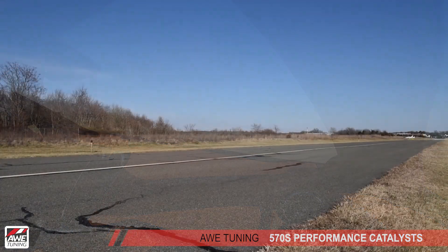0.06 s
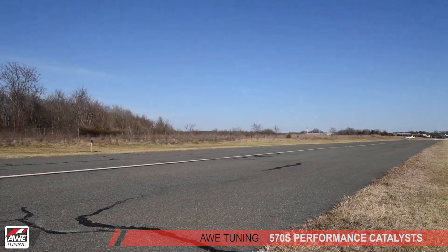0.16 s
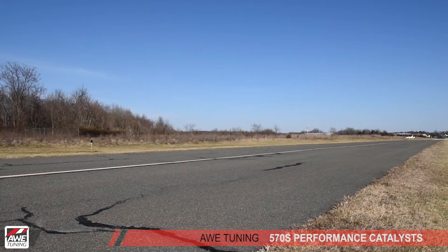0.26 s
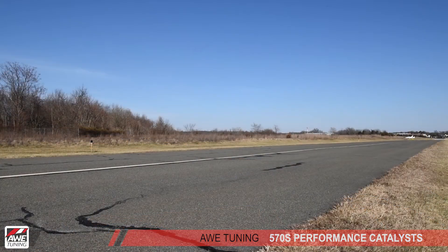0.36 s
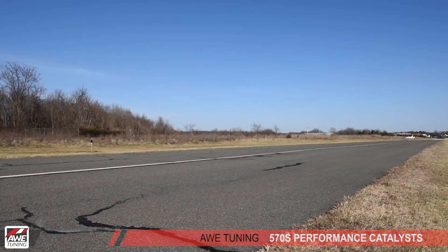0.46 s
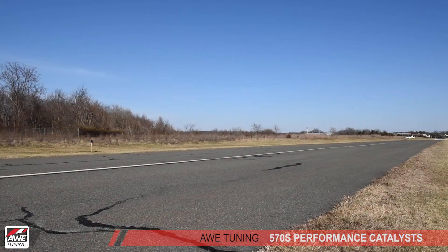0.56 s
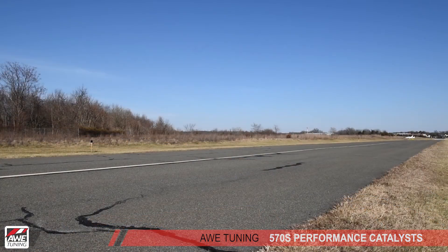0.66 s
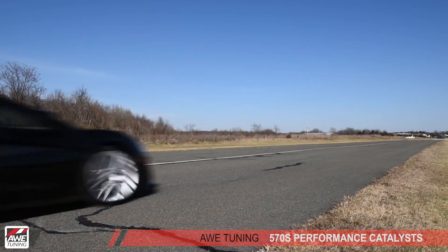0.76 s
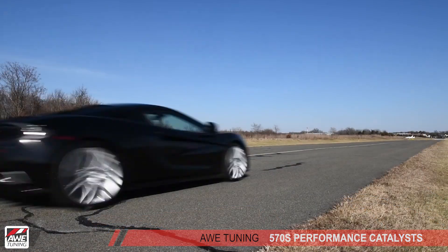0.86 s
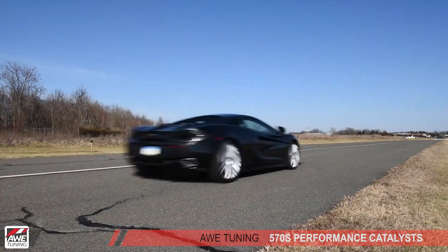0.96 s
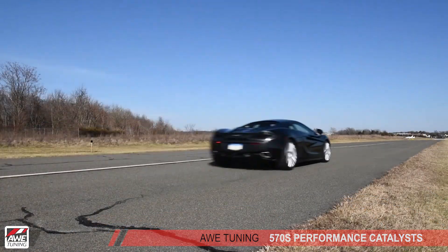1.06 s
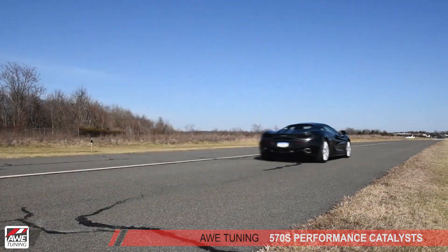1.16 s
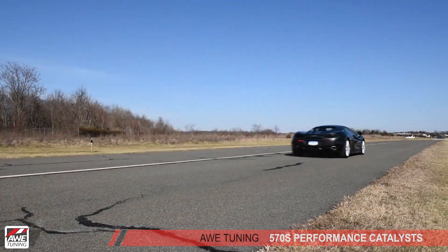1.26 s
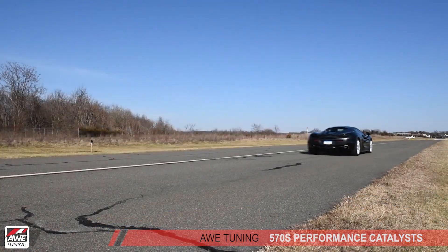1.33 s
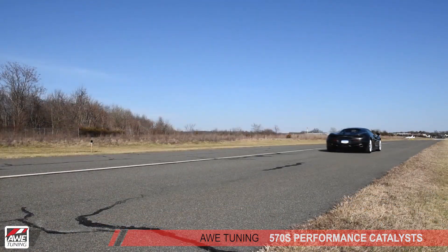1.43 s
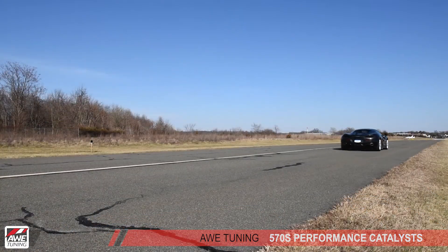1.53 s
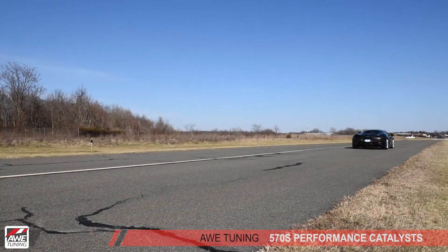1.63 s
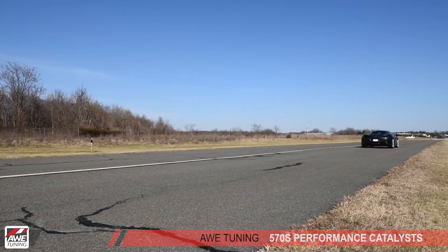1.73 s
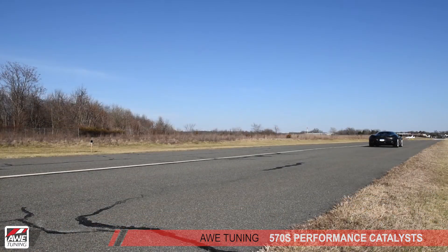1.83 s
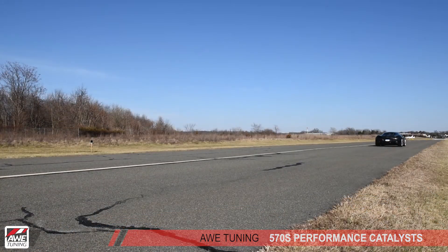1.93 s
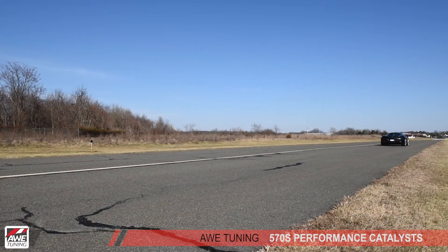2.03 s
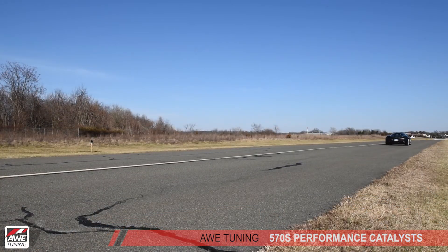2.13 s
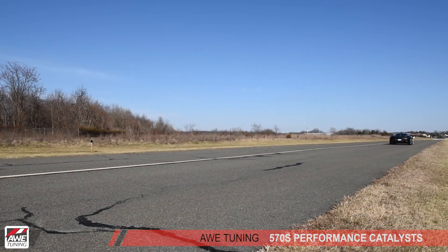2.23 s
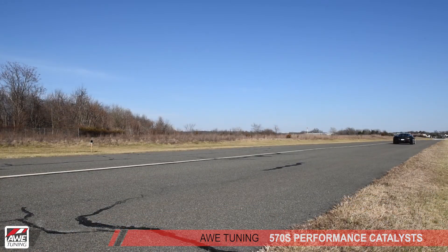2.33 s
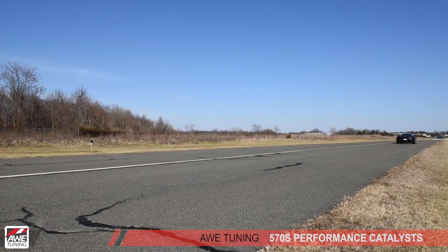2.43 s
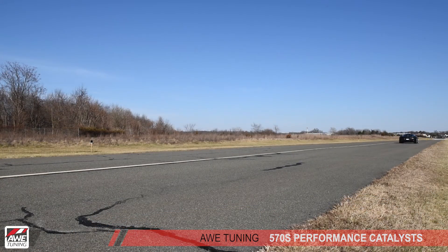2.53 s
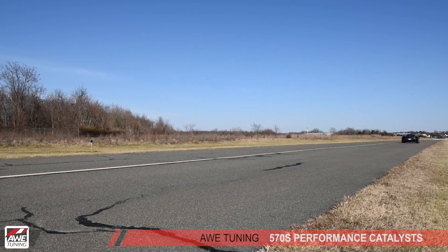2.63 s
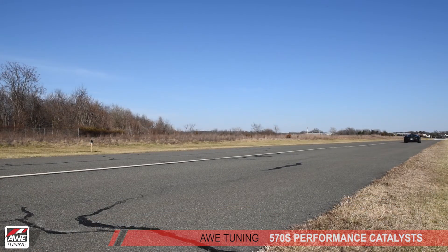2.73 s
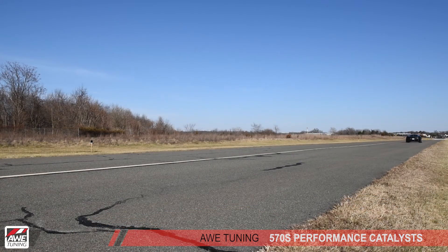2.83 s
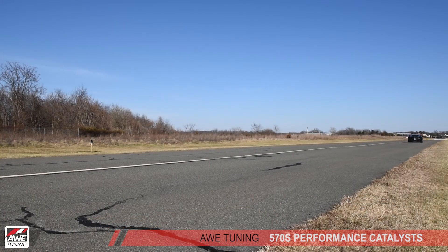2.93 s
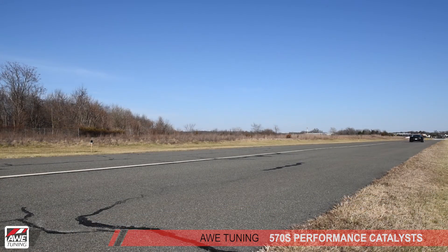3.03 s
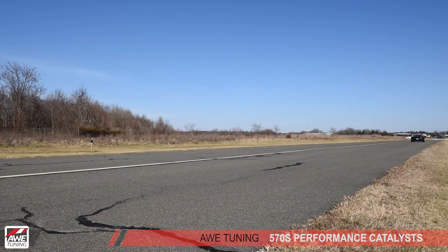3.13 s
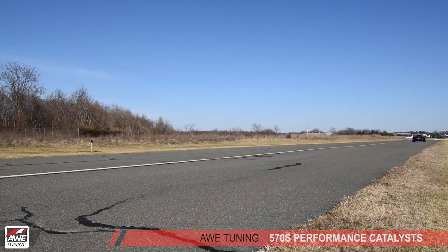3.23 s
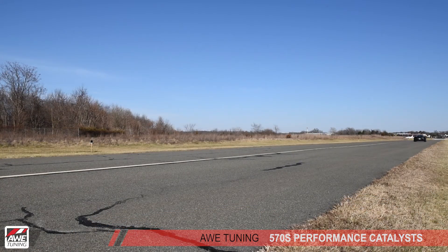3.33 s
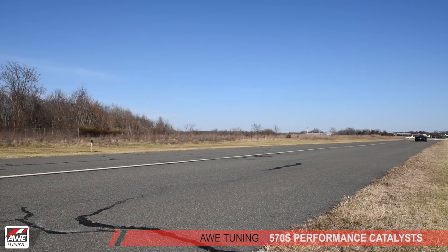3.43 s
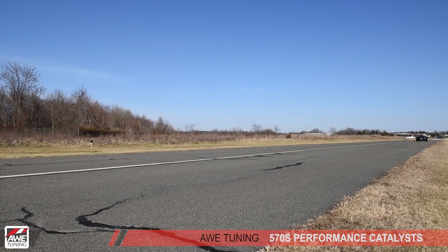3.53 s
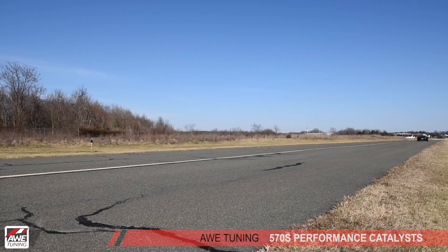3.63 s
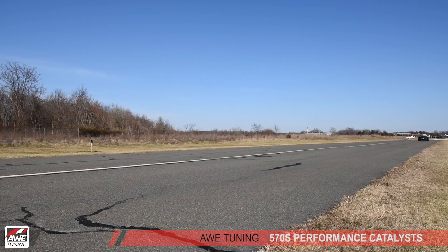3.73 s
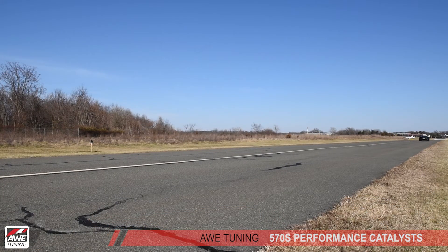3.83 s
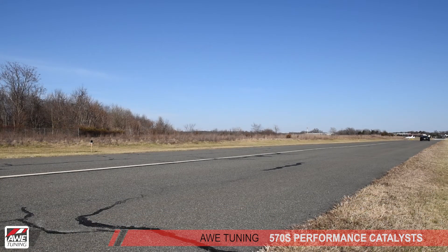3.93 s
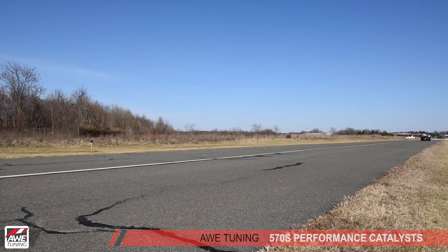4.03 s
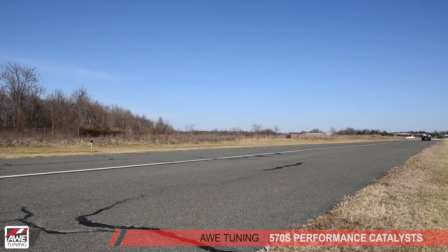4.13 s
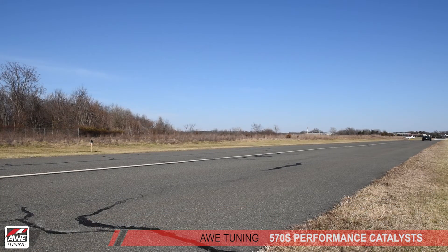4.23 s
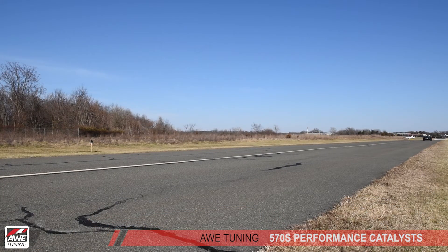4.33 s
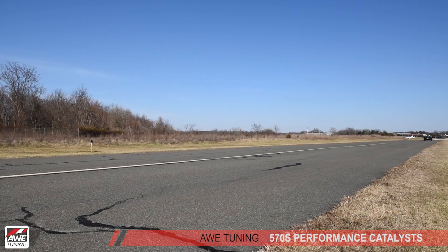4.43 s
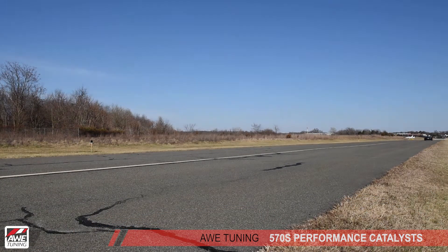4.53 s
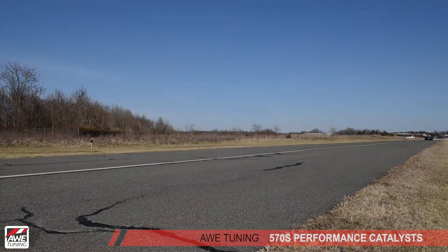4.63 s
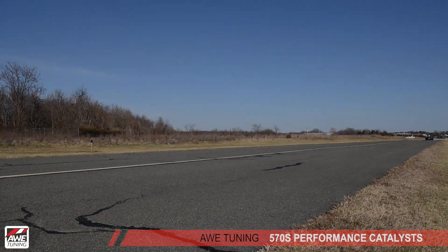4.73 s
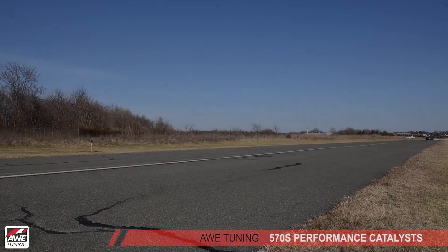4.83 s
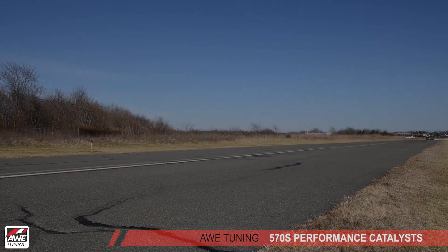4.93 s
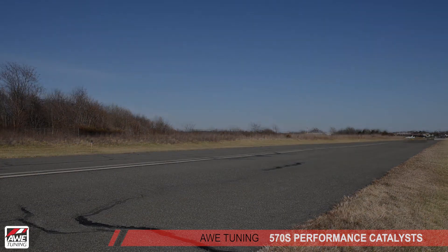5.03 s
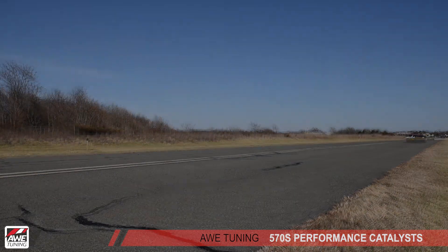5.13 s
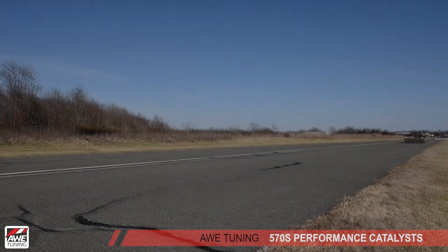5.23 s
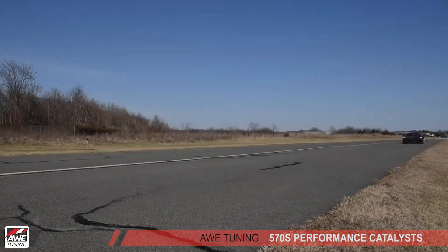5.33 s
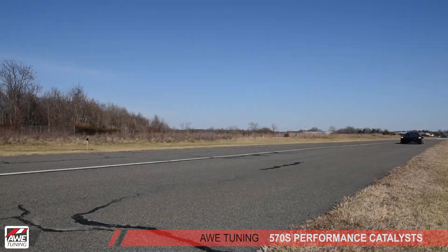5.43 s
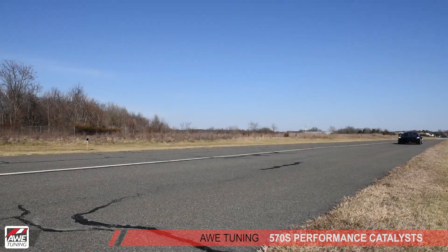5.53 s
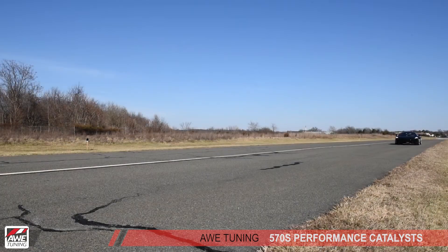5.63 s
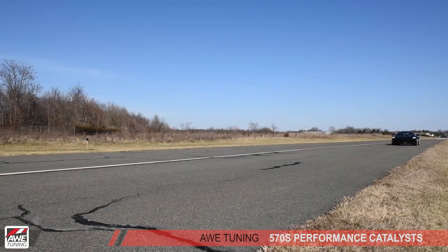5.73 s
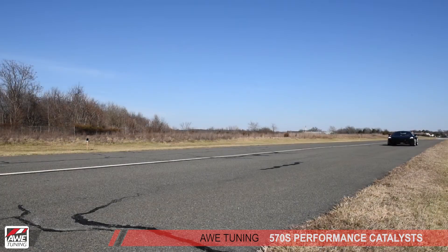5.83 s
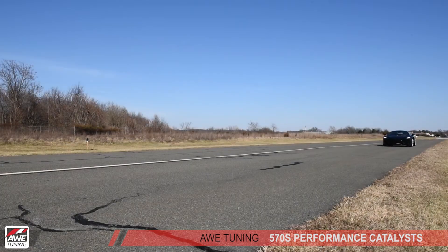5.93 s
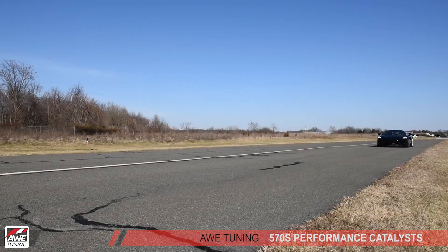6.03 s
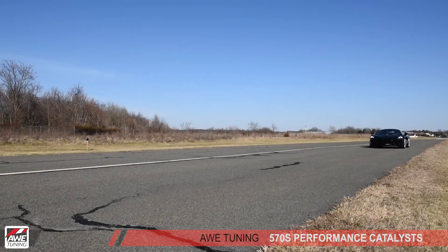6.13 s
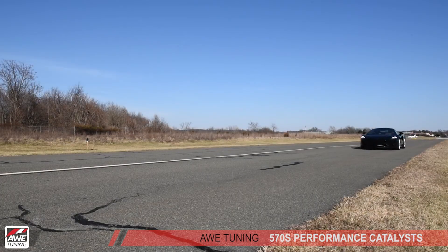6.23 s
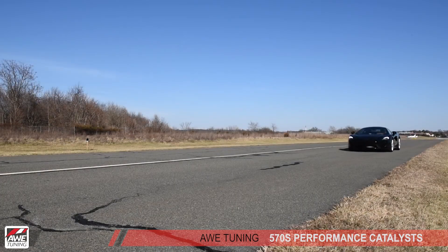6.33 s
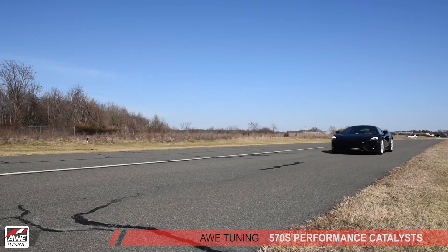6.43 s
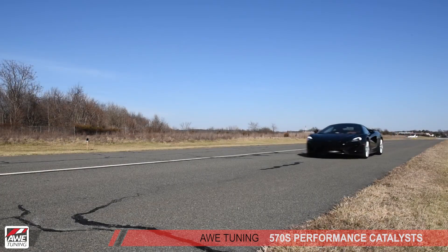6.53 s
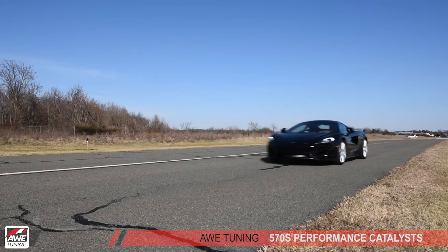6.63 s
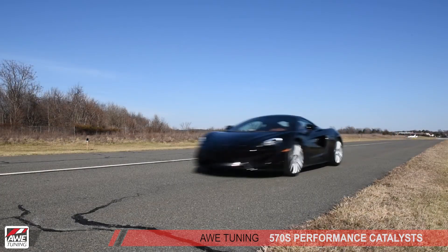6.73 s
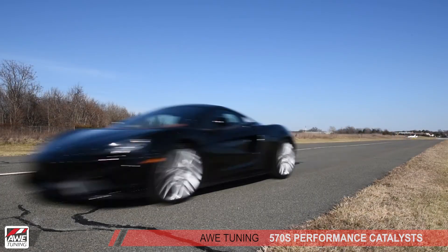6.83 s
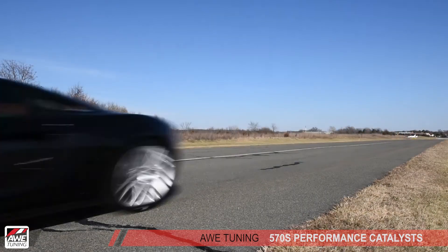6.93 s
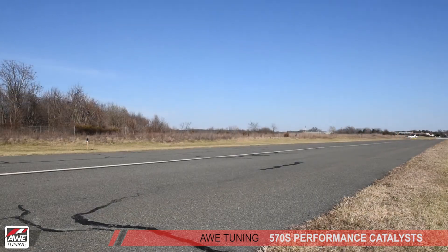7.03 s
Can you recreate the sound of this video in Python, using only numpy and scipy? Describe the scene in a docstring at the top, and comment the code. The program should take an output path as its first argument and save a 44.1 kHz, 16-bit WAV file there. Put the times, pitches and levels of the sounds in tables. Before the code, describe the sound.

A roadside stereo microphone on an open airstrip. At 0 s a short low wind thump sits over a receding engine note that sags in pitch and dissolves by 0.5 s. A V8 sports car rushes in from the left, level at about 0.9 s with a hard burst of tyre roar, rasp, hiss and sharp exhaust spits; its pitch drops as it passes to the right. Pulsing, raspy exhaust crackles until about 2 s while the car pulls away, with the note climbing slightly. At 2.8-3.0 s an upshift drops the note, now smoother and much fainter, dwindling to near silence by 5 s. From 5.3 s a distant engine emerges on the right, climbing under full throttle and brightening, tyres swelling after 6.2 s. At about 6.95 s it blasts past leftward, pitch plunging, with deep exhaust roar and wind buffeting, ending abruptly while loud.

```python
"""V8 car on an open airstrip

Three passes heard from the verge, fading into each other: one dies away in wind, one sweeps by, recedes and
shifts up, one accelerates in and roars past. The engine is a sum of firing orders with an uneven noisy burble;
tyre roar, exhaust rasp and hiss are coloured noise pulsed by the firings, and spits are decaying noise bursts.
Each moving pass crosses the stereo image; asphalt and trees reflect it, and the car's wake buffets the microphone."""
import sys
import numpy as np
from scipy import signal
from scipy.fft import rfft, irfft, next_fast_len
from scipy.io import wavfile
from scipy.ndimage import uniform_filter1d, map_coordinates

SR = 44100
rng = np.random.default_rng(int(sys.argv[2]) if len(sys.argv) > 2 else 0)


def wav_out(sig):
    """Save sig, one row per channel (or a flat mono array), as 16-bit PCM at SR to the path in sys.argv[1]."""
    wavfile.write(sys.argv[1], SR, np.round(np.clip(np.atleast_2d(sig).T, -1, 1) * 32767).astype(np.int16))


N = 311783
TIME_S = np.arange(N) / SR

# Sizzle at the tailpipe mouth, shared by hiss and spits: (frequency [Hz], level [dB])
SIZZLE_COLOUR = [(3200, -27.5), (4500, -4), (5600, -0.5), (7000, 1.5), (8200, -2), (9800, -3.5),
                 (11000, -12), (13000, -14.5), (15800, -27.5)]
# Tread noise, shared by the early hiss and the ticks: (frequency [Hz], level [dB])
TREAD_COLOUR = [(3200, -12), (4500, 0.5), (6000, -6), (8300, -2), (10500, -8), (13000, -15.5),
                (15800, -24.5)]

# Second pass: when abeam, time to travel its own distance from the verge, and fades (start s, end s)
AWAY_ABEAM_S, AWAY_PASSING_S = 0.88, 0.135
AWAY_IN_S, AWAY_OUT_S = (0.022, 0.38), (5, 5.3)
UPSHIFT_S = (2.83, 3.01)  # start, end
# Third pass, flat out
TOWARD_ABEAM_S, TOWARD_PASSING_S, TOWARD_IN_S = 6.97, 0.095, (4.78, 5.35)


def amp(db):
    """Decibels to linear gain."""
    return 10 ** (np.asarray(db) / 20)


def unit(x):
    """Scale to rms 1."""
    return x / np.sqrt(np.mean(x ** 2) + 1e-20)


def along(points, hz):
    """Read a curve of (Hz, value) points on a log frequency axis."""
    f, v = np.transpose(points)
    return np.interp(np.log(hz + 1), np.log(f + 1), v)


def curves(rows):
    """One automation curve, sample by sample, for each column after the time."""
    s, *columns = np.transpose(rows)
    return [np.interp(TIME_S, s, column) for column in columns]


def ramp(start, end):
    """Straight rise from 0 to 1 between two times in seconds."""
    return np.clip((TIME_S - start) / max(end - start, 1 / SR), 0, 1)


def fade_up(start, end):
    """Smooth rise from 0 to 1 between two times in seconds."""
    return np.sin(np.pi / 2 * ramp(start, end)) ** 2


def wobble(rate):
    """A smooth random curve, with rate knots a second."""
    knots = rng.standard_normal(int(N * rate / SR) + 4)
    return map_coordinates(knots, [np.arange(N) * rate / SR])


def filtered(x, response):
    """Filter x by a gain given as a function of frequency."""
    m = next_fast_len(N + SR // 2)
    return irfft(rfft(x, m) * response(np.fft.rfftfreq(m, 1 / SR)), m)[..., :N]


def noise(spectrum, gate=1, patchy_db=0):
    """Stereo noise of rms 1: gated, made patchy by turbulence, coloured; the ears agree less in the treble."""
    # Left-right likeness: (frequency [Hz], correlation [-1 to 1])
    likeness = [(50, 0.55), (300, 0.75), (1000, .78), (2500, 0.39), (8000, 0.19)]
    z = signal.stft(rng.standard_normal((2, N)) * gate, nperseg=1024)[2]
    patches = rng.standard_normal(z.shape[1:])
    patches = uniform_filter1d(uniform_filter1d(patches, size=5, axis=0), size=7, axis=1)
    pair = signal.istft(z * amp(patchy_db * unit(patches)), nperseg=1024)[1][:, :N]

    def mid_side_response(hz):
        angle = np.arccos(np.clip(along(likeness, hz), -1, 1)) / 2
        colour = amp(along(spectrum, hz)) / (1 + (hz / spectrum[-1][0]) ** 4)
        return colour * np.array([np.cos(angle), np.sin(angle)])

    mid, side = filtered(pair, mid_side_response)
    return unit(np.array([mid + side, mid - side]))


def track(abeam_s, passing_s):
    """A straight drive past: distance in dB over the nearest, and bearing from -1 (coming) to 1 (going)."""
    x = (TIME_S - abeam_s) / passing_s
    distance = np.hypot(1, x)
    return 20 * np.log10(distance), x / distance


def fades():
    """Gains of the three passes as they dissolve into each other."""
    first = 1 - ramp(0.29, 0.53)
    second = fade_up(*AWAY_IN_S) * (1 - ramp(*AWAY_OUT_S))
    return first, second, fade_up(*TOWARD_IN_S)


def away_db(layer):
    """Level of a layer in the second pass, from distance, bearing and gear."""
    # How each layer follows the car, by layer name: (level abeam [dB], loss [dB per dB of distance],
    # change while still ahead [dB], change after the upshift [dB])
    away_laws = { "order 1/2": (-18, 1.63, 2, -2), "order 3/2": (-28.5, 1.23, 3.5, -1.5),
                 "overtones": (-28, 1.07, -3.5, -3.5), "burble": (-25.5, 0.99, -5.5, -3), }
    level_db, loss, ahead_db, shifted_db = away_laws[layer]
    distance_db, bearing = track(AWAY_ABEAM_S, AWAY_PASSING_S)
    gear_db = shifted_db * ramp(*UPSHIFT_S)
    dimming_db = 5.8 * ramp(4.67, 5.1)  # these lesser layers sink first
    return level_db - loss * distance_db + ahead_db * np.maximum(-bearing, 0) + gear_db - dimming_db


def toward_db(layer):
    """Level of a layer in the third pass, from distance and the aim of the tailpipes."""
    # How each layer follows the car, by layer name: (level abeam [dB], loss [dB per dB of distance],
    # change with the pipes in view [dB], change at the peak of the blast [dB])
    toward_laws = { "order 1/2": (-31.5, 1.15, -4.5, 17), "order 3/2": (-47, .8, 15, 12),
                   "overtones": (-23.5, 1.58, 0.5, 7.5), "burble": (-27, 0.83, 7.5, 9), }
    level_db, loss, in_view_db, blast_db = toward_laws[layer]
    distance_db, _ = track(TOWARD_ABEAM_S, TOWARD_PASSING_S)
    in_view = ramp(6.86, 6.86)  # the pipes come into view at once
    blast = np.exp(-((TIME_S - 6.91) / 0.032) ** 2)
    dimming_db = 11.4 * (1 - ramp(4.95, 5.77))  # these lesser layers emerge last
    return level_db - loss * distance_db + in_view_db * in_view + blast_db * blast - dimming_db


def passes():
    """The three engine notes, and an unbroken firing count of whichever leads."""
    (second, away), (third, toward) = receding(), approaching()
    note = sum(gain * x for gain, x in zip(fades(), (fading(), second, third)))
    lead = ramp(5.1, 5.2)
    return note, away + np.cumsum(lead * np.gradient(toward - away))


def fading():
    """The first note: four low orders whose firing rate sags steadily."""
    # Orders 1/2, 1, 3/2, 2: (level at the start [dB], fall [dB per s])
    order_levels = [(-30.5, 18), (-29, -1.5), (-49, 6), (-35.5, 70)]
    hz = 159.2 - 39.4 * TIME_S
    low_db = [db - fall * TIME_S for db, fall in order_levels]
    return low_orders(hz, low_db, flutter_db=2, jitter=0.013)[0]


def receding():
    """The second note: Doppler drops it as the car sweeps by, it climbs, and the upshift drops it again."""
    # Firing note, before a small trim of order 1: (time [s], order 1 level [dB], order 2 level [dB])
    note_levels = [(0.45, -39.5, -43.5), (0.55, -27, -34.5), (0.73, -26.5, -30.5), (0.85, -15, -34),
                   (0.89, -16.5, -23), (1.02, -30.5, -23.5), (1.26, -30.5, -36.5), (2.22, -29.5, -41.5),
                   (2.75, -34.5, -52), (2.86, -34.5, -44), (3.28, -43, -70.5), (3.74, -44, -60.5),
                   (3.81, -44.5, -59.5), (4.5, -41, -55.5), (4.93, -46.5, -67), (5.2, -55.5, -67)]
    # Overtones in the higher gear: (multiple of the firing rate, level [dB])
    cruise_orders = [(2.5, -14), (3, -2.5), (3.5, -17.5), (4, -14.5)]
    # Resonances heard from behind: (frequency [Hz], level [dB])
    tail_body = [(420, -11.5), (510, -7), (600, -3), (680, -10.5), (820, -17.5), (1010, -13.5),
                 (1200, -21.5), (1500, -23)]
    # The engine pulls steadily in each gear: firing Hz plus rise in Hz per s
    low_gear_hz = 174.8 + 10 * (TIME_S - AWAY_ABEAM_S)
    high_gear_hz = 153.8 + 4.7 * (TIME_S - UPSHIFT_S[1])
    gear = fade_up(*UPSHIFT_S)
    engine_hz = (1 - gear) * low_gear_hz + gear * high_gear_hz
    bearing = track(AWAY_ABEAM_S, AWAY_PASSING_S)[1]
    hz = engine_hz * (1 - 0.055 * bearing)  # Doppler shift
    first_db, second_db = curves(note_levels)
    low_db = [away_db("order 1/2"), first_db - 0.5, away_db("order 3/2"), second_db]
    low, firings = low_orders(hz, low_db, flutter_db=0.5, jitter=0.005)
    cruise = sum(amp(db) * tone(firings, np.round(2 * k) / 2, flutter_db=2.0) for k, db in cruise_orders)
    jitter = 0.018 + 0.02 * (1 - ramp(0.81, 1.3))
    coarse = overtones(firings, tail_body, half_db=1.0, flutter_db=3.0, jitter=jitter)
    shifted = ramp(2.85, 3.14)  # after the upshift the note turns smoother
    upper = (1 - shifted) * coarse + shifted * cruise
    return low + amp(away_db("overtones")) * upper, firings


def approaching():
    """The third note climbs under full throttle and plunges as the car passes."""
    # Engine as heard, Doppler included: (time [s], firing rate [Hz], order 1 level [dB], order 2 level [dB])
    heard_note = [(5.2, 152.2, -60.5, -52), (5.558, 175.8, -45, -37.5), (5.85, 197.9, -34, -43),
                  (6.328, 237.1, -36, -51.5), (6.484, 262.2, -40, -53), (6.62, 254.3, -37, -43),
                  (6.724, 267, -37.5, -51), (6.87, 271.3, -37.5, -23), (6.926, 217.6, -23, -30),
                  (6.948, 206.8, -16, -39), (6.962, 199.5, -9.5, -23), (7.04, 193.9, -8, -16),
                  (7.07, 192.2, -11.5, -36.5)]
    # Resonances heard from ahead: (frequency [Hz], level [dB])
    nose_body = [(400, -12.5), (540, -8), (650, -1.5), (790, -6), (910, -9.5), (1040, -4), (1180, -16.5),
                 (1330, -4.5), (1550, -19), (2200, -26)]
    hz, first_db, second_db = curves(heard_note)
    low_db = [toward_db("order 1/2"), first_db, toward_db("order 3/2"), second_db]
    low, firings = low_orders(hz, low_db, flutter_db=1.7, jitter=0.0069)
    # From ahead both banks blend, so half orders are weak; distance dulls the rest
    dull_db = 6.7 * (1 - ramp(5.6, 6.5))
    nose = overtones(firings, nose_body, half_db=-16.5, flutter_db=2.5, jitter=0.02, dull_db=dull_db)
    return low + amp(toward_db("overtones")) * nose, firings


def low_orders(hz, low_db, flutter_db, jitter):
    """Orders 1/2, 1, 3/2 and 2 of the firing rate, slightly uneven; also the running count of firings."""
    firings = np.cumsum(hz) / SR + jitter * wobble(30)
    orders = sum(amp(db) * tone(firings, (k + 1) / 2, flutter_db) for k, db in enumerate(low_db))
    return -orders, firings


def overtones(firings, body, half_db, flutter_db, jitter, dull_db=0, count=13):
    """Orders from 5/2 up, in halves, sweep through fixed resonances; uneven firing blurs the high ones."""
    hz = np.abs(np.gradient(firings)) * SR
    uneven = firings + jitter * wobble(70)
    total = 0
    for k in np.arange(count) + 5:  # k counts half orders
        order_hz = hz * k / 2
        dulling_db = dull_db * np.clip(np.log2(order_hz / 650 + 1e-6), 0, 1)
        level_db = along(body, order_hz) - dulling_db + half_db * (k % 2)
        total = total + amp(level_db) * tone(uneven, k / 2, flutter_db, rng.random())
    return total


def tone(firings, multiple, flutter_db, phase=0):
    """One engine order: a sine locked to the firings, its level fluttering in the moving air."""
    flutter = amp(flutter_db * wobble(25))
    return np.sqrt(2) * flutter * np.cos(2 * np.pi * (multiple * firings + phase))


def rush(firings):
    """Burble, tyre roar, rasp and hiss; exhaust pulses bite deepest with the pipes near and facing the ear."""
    # Unequal cylinders sound between the main orders: (multiple of the eight-firing cycle, level [dB])
    uneven_orders = [(3, -7.5), (5, 3), (6, -4.5), (7, -7), (9, -6), (10, -16.5), (11, -7), (13, -9),
                     (14, -9)]
    # Noise colours, the _ahead ones heard from in front of the car: (frequency [Hz], level [dB])
    burble_colour = [(30, -33.5), (55, -8), (95, -1.5), (200, 0), (300, -13.5), (420, -13.5), (800, -39)]
    tyre_colour = [(200, -18.5), (350, -6.5), (550, -5.5), (760, -4), (1040, 3), (1350, -3), (1700, -6.5),
                   (2800, -27.5)]
    tyre_colour_ahead = [(200, -19), (350, 1.5), (600, -3), (900, -4.5), (1100, 1), (1350, 2.5),
                         (1600, -5.5), (2800, -34.5)]
    rasp_colour = [(900, -22.5), (1500, -7), (1900, -3.5), (2300, -1), (2650, -2.5), (3050, -2.5),
                   (3500, -4.5), (4050, -5.5), (4500, -15.5), (6500, -41)]
    rasp_colour_ahead = [(900, -21.5), (1400, -8), (1750, 0.5), (2100, 0), (2600, -2.5), (3200, -2.5),
                         (4000, -8.5), (4700, -15), (6500, -40)]
    # Levels in the low gear, the high gear and coming back, before the layer gains:
    # (time [s], tyre roar [dB], exhaust rasp [dB], hiss [dB])
    levels_low_gear = [(0.0, -48, -59, -70), (0.02, -52, -57.5, -73), (0.45, -53, -54, -64),
                       (0.8, -35.5, -40, -41), (0.91, -36, -30.5, -24.5), (0.92, -34.5, -33, -30),
                       (1.04, -30.5, -34.5, -39), (1.22, -34, -33, -37), (1.35, -36, -39, -44.5),
                       (1.61, -40.5, -41, -41.5), (1.64, -44.5, -43, -48), (1.87, -48, -44.5, -50.5),
                       (1.97, -53.5, -43.5, -46), (2.12, -48.5, -50.5, -57), (2.29, -55, -53.5, -58),
                       (2.55, -62, -54.5, -60.5)]
    levels_high_gear = [(2.7, -60.5, -59, -61.5), (2.88, -59, -64.5, -72), (3.26, -68, -70, -77.5),
                        (3.5, -64, -70, -83.5), (3.75, -70.5, -72, -81), (4.03, -67, -69, -84),
                        (4.15, -67.5, -72.5, -80.5), (4.39, -67, -66, -82), (4.65, -62.5, -67.5, -82.5),
                        (4.88, -74, -74.5, -86), (4.89, -74, -75.5, -86), (5.05, -77.5, -77.5, -105)]
    levels_toward = [(5.2, -73.5, -81, -104), (5.382, -75, -83.5, -105), (5.516, -69, -78, -86),
                     (6.152, -52.5, -59, -69), (6.562, -42.5, -42.5, -45.5), (6.62, -39, -42.5, -48),
                     (6.718, -34.5, -35.5, -43.5), (6.844, -27.5, -32, -37.5), (6.948, -15, -23, -32),
                     (6.962, -24.5, -30.5, -33), (7.036, -21.5, -23.5, -23.5), (7.07, -28, -26.5, -21.5)]
    tyre_db, rasp_db, hiss_db = curves(np.vstack([levels_low_gear, levels_high_gear, levels_toward]))
    passed, ahead = ramp(0.76, 0.88), ramp(4.9, 5.3)
    behind = passed * (1 - ahead)

    burble_db = -31 - 23 * TIME_S, away_db("burble"), toward_db("burble")  # one per pass
    burble_gain = np.sqrt(sum((gain * amp(db)) ** 2 for gain, db in zip(fades(), burble_db)))
    lope = unit(sum(amp(db) * tone(firings, np.round(k) / 8, 2.5, rng.random()) for k, db in uneven_orders))
    burble = burble_gain * (amp(-4) * lope + amp(-2.5) * noise(burble_colour))

    facing = 0.2 + 0.8 * behind * (1 - 0.5 * ramp(2.7, 3.1)) + 0.5 * ramp(6.85, 6.95)
    gate = puffs(firings, depth=0.47 * facing, scatter_db=4, pattern_db=4.0)
    tyres = (1 - ahead) * noise(tyre_colour, gate, patchy_db=2.0)
    tyres = tyres + ahead * noise(tyre_colour_ahead, gate, patchy_db=1.5)

    gate = puffs(firings, depth=0.5 * facing, scatter_db=1.5, pattern_db=0.5)
    rasp = behind * noise(rasp_colour, gate, patchy_db=3.0)
    rasp = rasp + (1 - behind) * noise(rasp_colour_ahead, gate, patchy_db=2.0)

    gate = puffs(firings, depth=0.6 * facing, scatter_db=3.0, pattern_db=0)
    hiss = passed * noise(SIZZLE_COLOUR, gate, patchy_db=2.5)
    hiss = hiss + (1 - passed) * noise(TREAD_COLOUR, patchy_db=1.0)

    surge = ramp(1.4, 1.5) * (1 - ahead) * wobble(14)  # the exhaust surges as the car pulls away
    tyres = amp(tyre_db + 2.5) * tyres
    rasp = amp(rasp_db + 4 + 1.1 * surge) * rasp
    hiss = amp(hiss_db + 3.5 + 1.6 * surge) * hiss
    return burble + tyres + rasp + hiss


def puffs(firings, depth, scatter_db, pattern_db):
    """Gas leaves in bursts, one per firing of the nearer bank; its four cylinders differ in strength."""
    bank = firings / 2
    index = (bank - bank.min() // 1).astype(int)
    scatter = rng.uniform(-1.7, 1, index.max() + 1)[index]
    size_db = scatter_db * scatter + pattern_db * np.cos(np.pi * index / 2)
    burst = unit(amp(size_db) * np.exp(-(bank % 1) / 0.31))
    share = np.clip(depth, 0, 1)  # part of the power that pulses
    return np.sqrt(1 - share + share * burst ** 2)


def spits():
    """Each spit barks in the tailpipe and sizzles at its mouth; faint ticks sound besides."""
    # Exhaust spits, before the layer gains: (time [s], peak [dB], bark over peak [dB], sizzle over peak [dB])
    spit_events = [(0.606, -30, -12.5, -8), (0.8475, -20, -13.5, -8.5), (0.87, -18, -16, -10),
                   (0.8815, -15.5, -13, -10.5), (0.893, -14, -15.5, -10), (0.907, -9, -20.5, -10.5),
                   (1.06, -17.5, -8, -16.5), (1.2117, -15, -9, -10.5), (1.257, -15, -9.5, -15.5),
                   (1.3065, -22.5, -16, -14), (1.4, -27, -9.5, -13), (1.436, -24, -13, -10.5),
                   (1.5997, -20.5, -12.5, -7.5), (1.774, -22.5, -10, -13.5), (1.9243, -27, -9.5, -15),
                   (1.957, -27, -15.5, -7), (2.002, -27, -7, -16.5), (2.6265, -30, -16.5, -10)]
    # Faint ticks, before the layer gain: (time [s], peak [dB])
    tick_events = [(0.0414, -55), (0.0847, -50.5), (0.1294, -56), (0.2137, -45.5), (5.9655, -56.5),
                   (6.0092, -54), (6.232, -44)]
    # Tailpipe bark: (frequency [Hz], level [dB])
    bark_colour = [(800, -22), (1100, -4), (1800, -16.5), (2500, -8.5), (3000, -2), (3500, -9.5),
                   (4100, -3.5), (5500, -29.5)]
    s, peak_db, bark_db, sizzle_db = np.transpose(spit_events)
    bark = amp(4) * cracks(zip(s, peak_db + bark_db), bark_colour, t60=0.035)
    sizzle = amp(-2) * cracks(zip(s, peak_db + sizzle_db), SIZZLE_COLOUR, t60=0.04)
    ticks = amp(-5) * cracks(tick_events, TREAD_COLOUR, t60=0.04)
    return bark + sizzle + ticks


def cracks(events, spectrum, t60):
    """Short bursts of coloured noise that die away by 60 dB in t60 seconds."""
    t = np.arange(SR // 8) / SR
    envelope = np.zeros(N + SR)
    for s, db in events:
        envelope[round(s * SR):][:len(t)] += amp(db - 60 * t / t60)
    return envelope[:N] * noise(spectrum)


def road_bounce(x, abeam=0.92, passing=0.19, lag_ms=0.39, strength=0.41):
    """A reflection off the asphalt combs the sound; its lag is longest as the car draws level."""
    n = np.arange(N)
    closeness = 1 / np.hypot(1, (TIME_S - abeam) / passing)
    delayed = n - closeness * lag_ms * SR / 1000
    echo = np.array([map_coordinates(ear, [delayed], mode="nearest") for ear in x])
    echo = filtered(echo, lambda hz: hz / (hz + 300))  # the bounce is thin in the bass
    share = strength * closeness ** 2
    return (x + share * echo) / np.hypot(1, share)


def placed(car):
    """The car's bearing delays the far ear and shades its treble."""
    # Head shadow: (frequency [Hz], share of the left-right level difference)
    shadow = [(200, .05), (1000, 0.55), (2800, 0.8), (7000, 1)]
    back = ramp(*TOWARD_IN_S)
    away = crossing(1.155, width_s=0.33, pan_db=5.5, lag_ms=0.15)
    toward = crossing(7.01, width_s=0.067, pan_db=2.9, lag_ms=0.14)
    pan_db, lag_ms = (1 - back) * away - back * toward  # the third pass runs from right to left
    gains = amp(np.array([pan_db, -pan_db]) / 2)
    gains = gains / np.sqrt(np.mean(gains ** 2, axis=0))
    treble = filtered(car, lambda hz: along(shadow, hz))
    left, right = car + (gains - 1) * treble
    shift = lag_ms * SR / 1000 / 2  # half the lag for each ear, in samples
    n = np.arange(N)
    left = map_coordinates(left, [n - shift], order=5, mode="nearest")
    right = map_coordinates(right, [n + shift], order=5, mode="nearest")
    return np.array([left, right])


def crossing(s, width_s, pan_db, lag_ms):
    """Left-right level difference and left-ear lag for a car that crosses from left to right."""
    side = np.tanh((TIME_S - s) / width_s)
    return np.array([-pan_db * side, lag_ms * side])


def treeline(note):
    """The trees scatter the engine note back as a faint diffuse tail, different in each ear."""
    level_db, t60_s = -18.5, 0.25
    t = np.arange(SR // 3) / SR
    tail = rng.standard_normal((2, len(t))) * amp(-60 * t / t60_s)
    tail = tail / np.linalg.norm(tail[0])
    return amp(level_db) * signal.fftconvolve(note[None], tail, axes=1)[:, :N]


def wind():
    """Lumpy buffeting in the wake of the car, alike in both ears, over a faint outdoor rumble."""
    # Gusts on the microphone: (time [s], peak [dB], rise [dB per s], fall [dB per s])
    gusts = [(0.032, -20, 596, 550), (.18, -33, 20, 50), (.88, -65, 67.5, 50), (6.7, -50, 90, 90),
             (6.92, -21, 330, 115)]
    # Wind rumble: (frequency [Hz], level [dB])
    wind_colour = [(10, -11), (25, -7.5), (45, -0.5), (70, 0), (110, -6.5), (180, -22.5), (400, -29),
                   (1500, -74)]
    shapes_db = [db - np.maximum(rise * (s - TIME_S), fall * (TIME_S - s)) for s, db, rise, fall in gusts]
    gust_db = np.max(shapes_db, axis=0)
    buffet = amp(gust_db + 3.0 * wobble(6.9)) * noise(wind_colour).mean(axis=0)
    return buffet + amp(-63.5) * noise(wind_colour)


def scene():
    """The car on the strip, the trees beside it, and the wind."""
    note, firings = passes()
    car = placed(note + road_bounce(rush(firings) + spits()))
    return ramp(0, 0.006) * (car + treeline(note) + wind())


def record(dry):
    """Round off the highest peaks, then cut everything from the band limit up."""
    rounded = dry / (1 + np.abs(dry) ** 8) ** (1 / 8)
    return filtered(rounded, lambda hz: hz < 15750)


dry = scene()
out = record(dry)
wav_out(out)
```